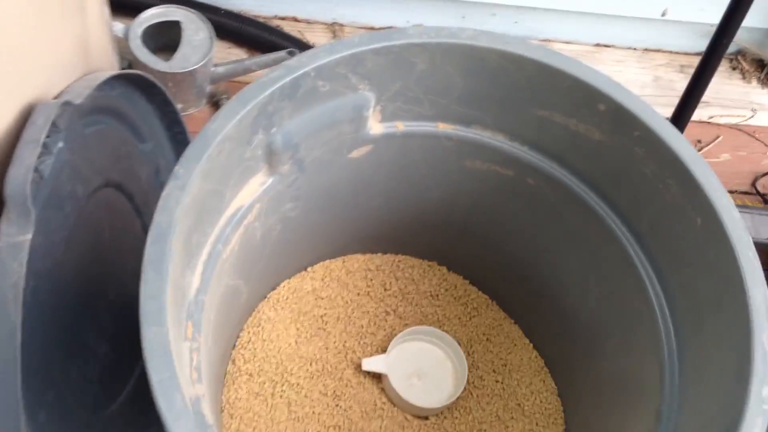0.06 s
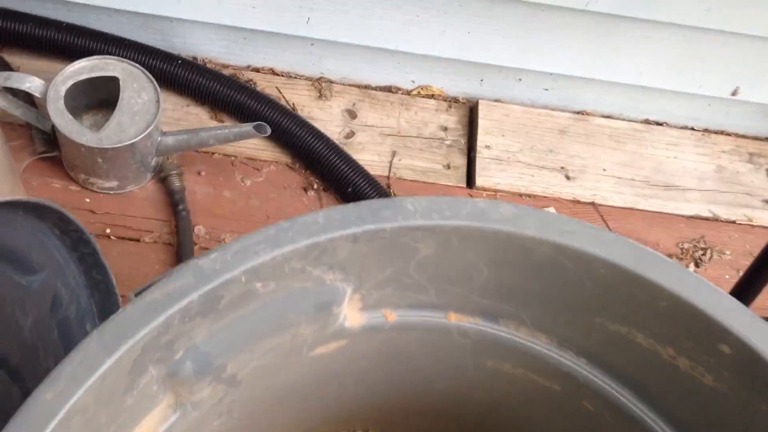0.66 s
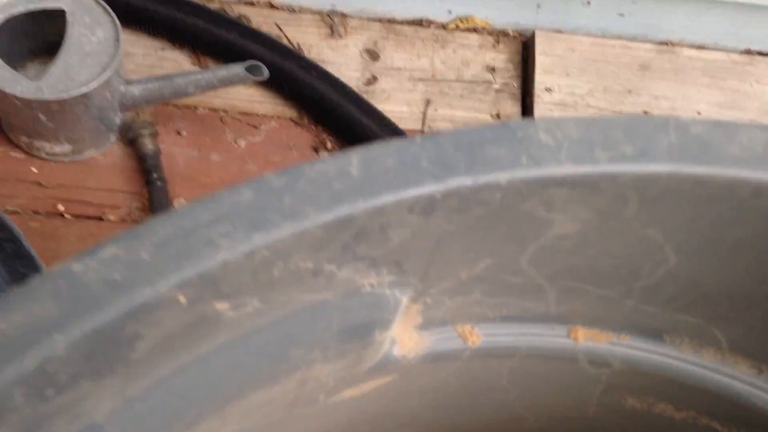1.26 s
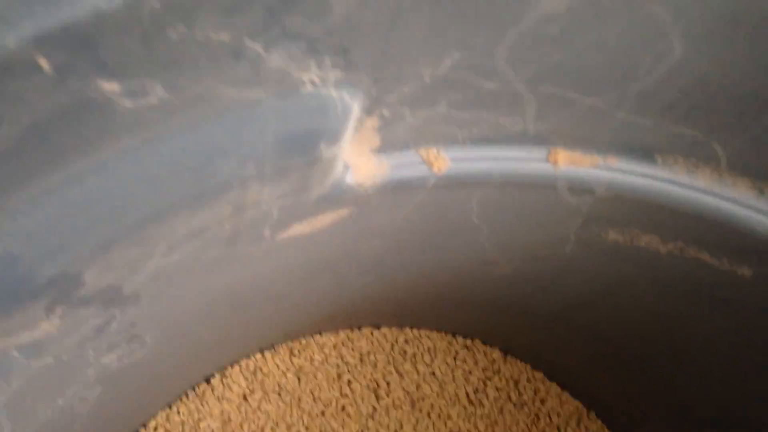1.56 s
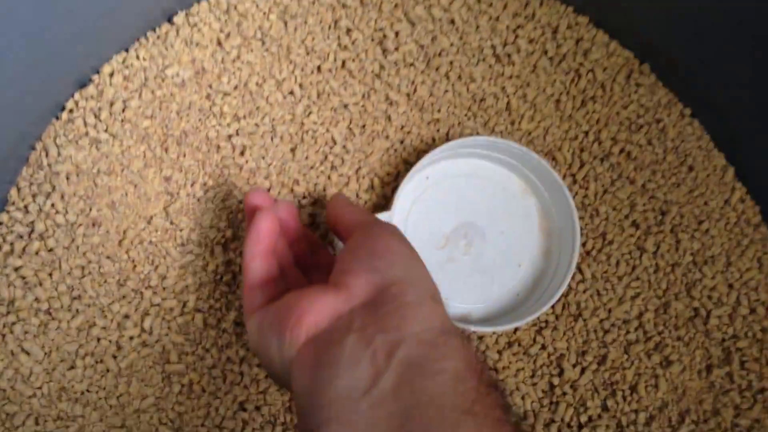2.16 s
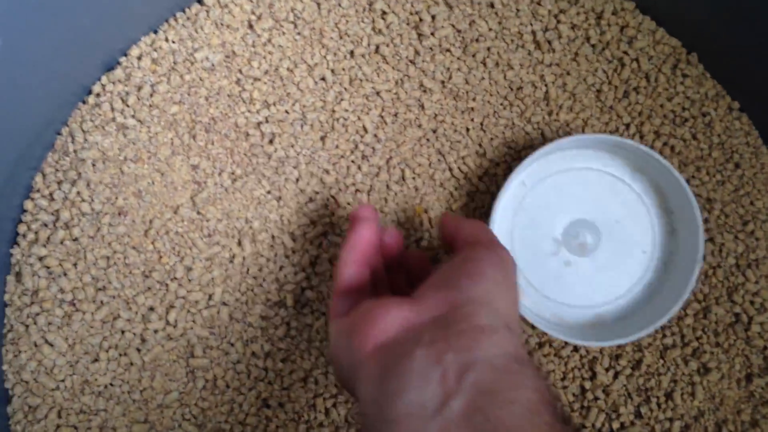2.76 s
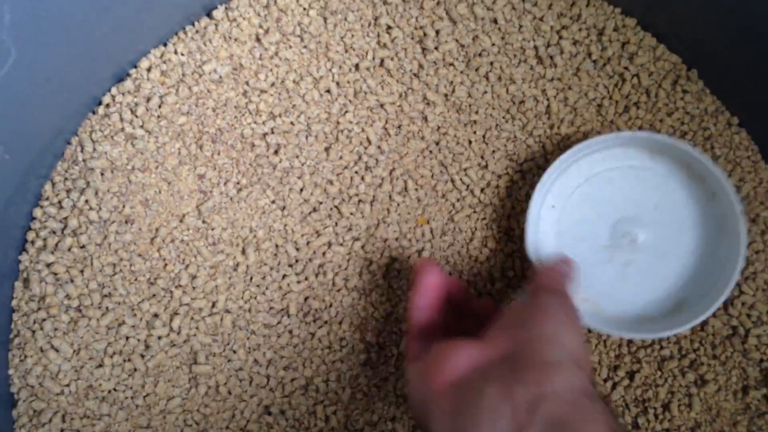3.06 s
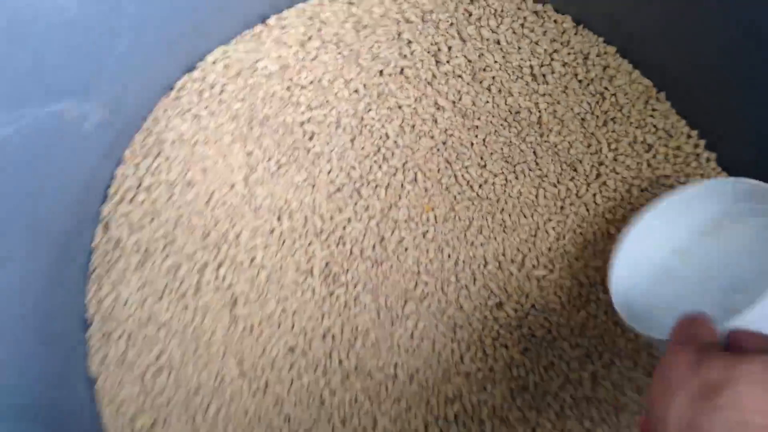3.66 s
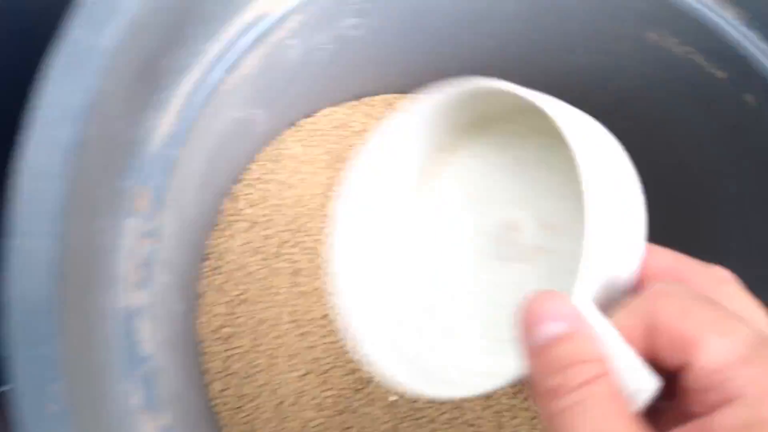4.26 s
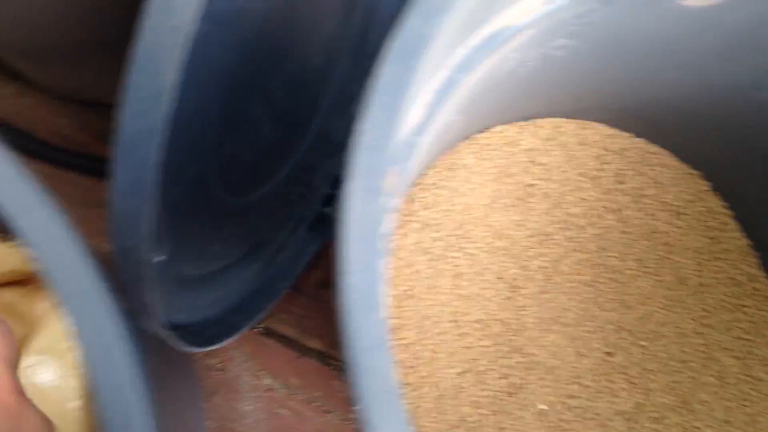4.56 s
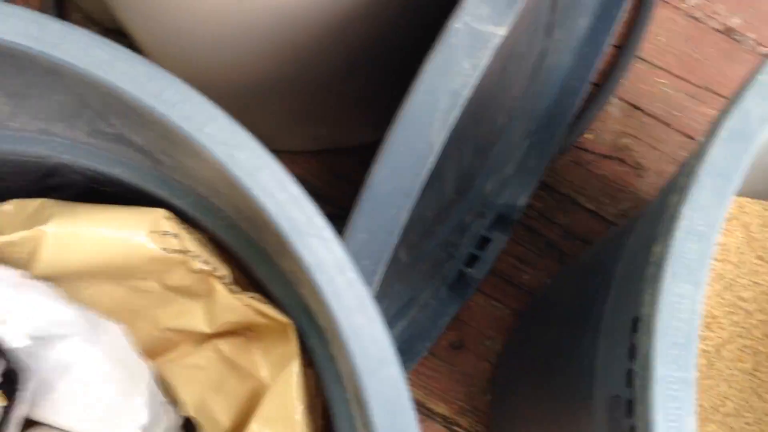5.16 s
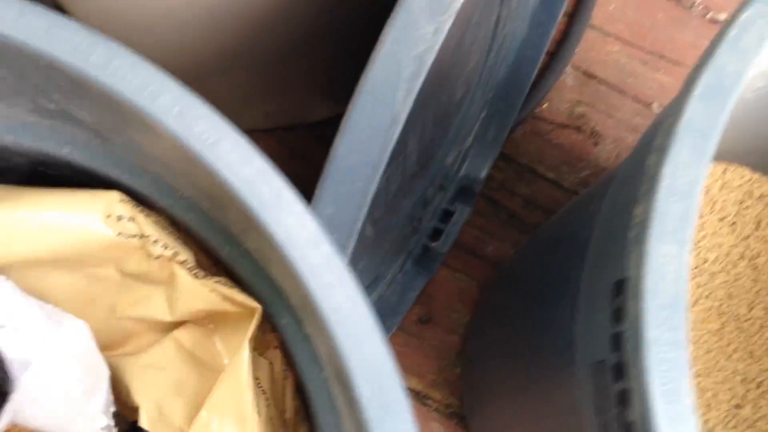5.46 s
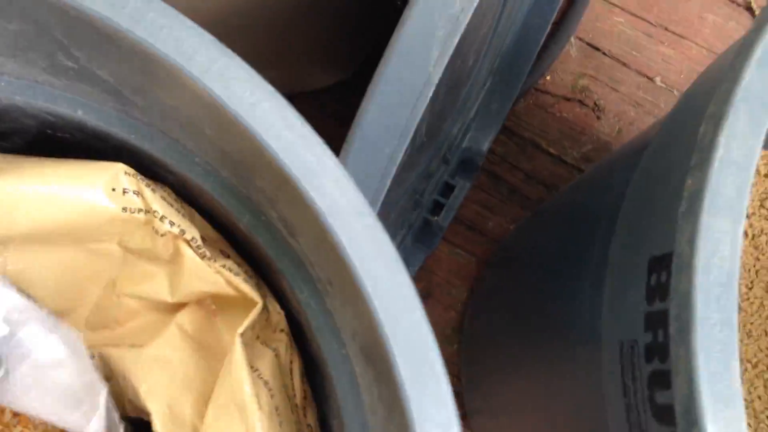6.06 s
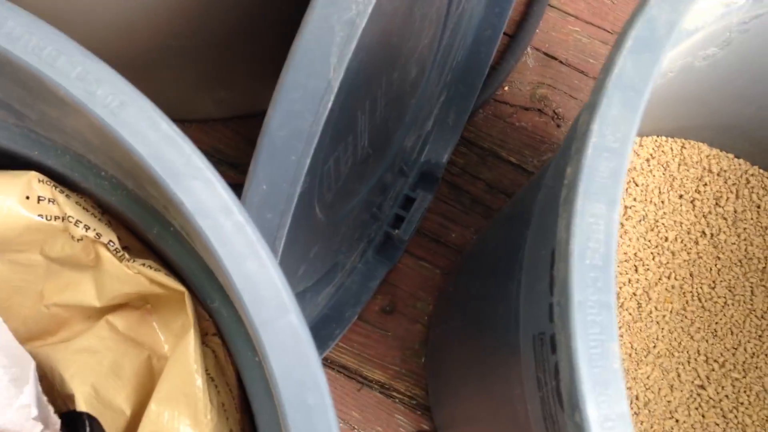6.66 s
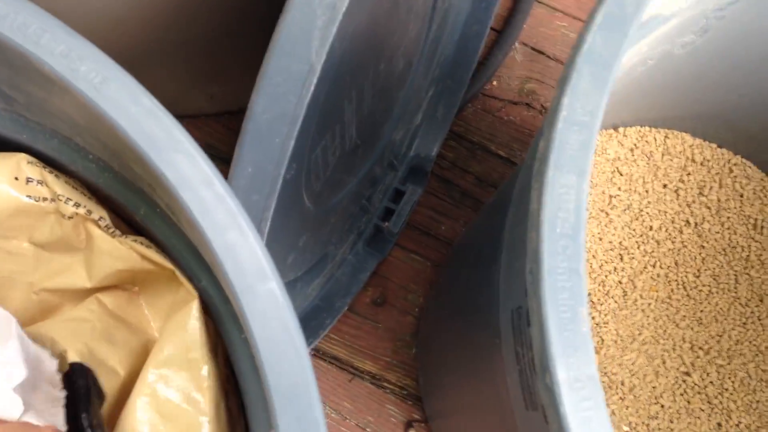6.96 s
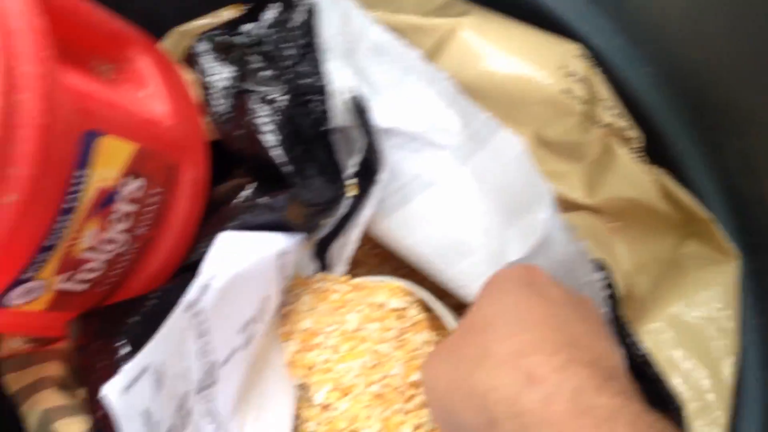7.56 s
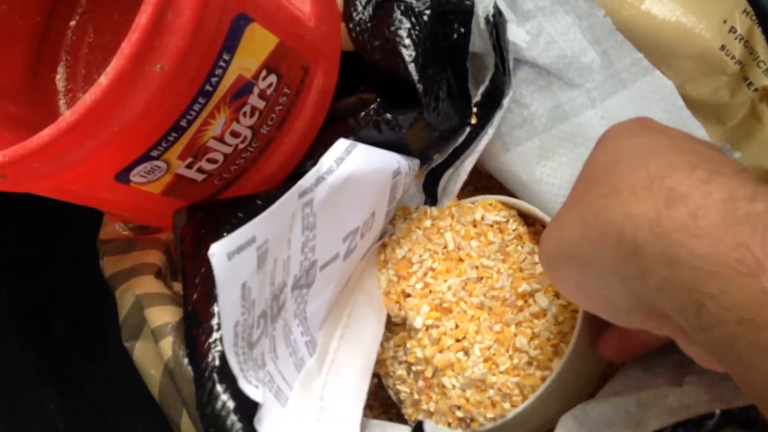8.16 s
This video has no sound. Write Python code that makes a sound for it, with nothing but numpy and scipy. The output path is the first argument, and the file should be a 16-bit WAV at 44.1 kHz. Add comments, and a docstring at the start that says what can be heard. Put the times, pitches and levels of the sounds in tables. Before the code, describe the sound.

A plastic cup scrapes through feed pellets in a bin, then a stiff bag of cracked corn crinkles and snaps.

```python
"""Light taps on plastic and a dull bump over quiet outdoor air and microphone handling rumble.
A plastic measuring cup is nudged, then dug through feed pellets in a big plastic bin: the pellets
ring its wall and hiss against each other. From about 4.9 s it pushes into a stiff bag of cracked corn
in the next bin: the sheet flexes and crinkles, corn slides along it, creases snap and panels buckle.
Hands bump the bins throughout."""
import sys
import numpy as np
from scipy import signal
from scipy.fft import rfft, irfft, next_fast_len
from scipy.io import wavfile
from scipy.ndimage import uniform_filter1d

SR = 44100
rng = np.random.default_rng(int(sys.argv[2]) if len(sys.argv) > 2 else 0)


def unload_audio(sound):
    """Save the sound as a 16-bit wav file, at the path given as the first command line argument."""
    columns = np.transpose(np.atleast_2d(sound))
    # keep every value between -1 and 1, then stretch to whole-number steps
    steps = np.round(np.clip(columns, -1, 1) * 32767)
    wavfile.write(sys.argv[1], SR, steps.astype(np.int16))


N = 371322
TIME_S = np.arange(N) / SR
COARSE_TIME_S = TIME_S[::32]

# Bag creases snapping. Each row: start in seconds, crack level in dB, crack pitch in Hz,
# pop, sizzle and panel thump levels in dB, panel pitch in Hz.
CREASE_SNAPS = [(4.866, -48, 2280.0, -46, -47, -34, 193.3), (4.9, -35.5, 2290.0, -38, -41, -39, 307),
                (4.911, -37.5, 2350.0, -48, -49, -30.5, 245.0), (4.9316, -38, 2350, -46, -30.5, -46, 295.0),
                (4.979, -30, 2590, -37, -33.5, -42, 355.0), (5.0019, -28.5, 2500, -29, -33.5, -39, 345.0),
                (5.03, -26, 2490, -36.5, -35, -47, 360.0), (5.068, -33, 2550, -36.0, -29.5, -43, 210.0),
                (5.073, -27, 2330, -34, -32, -23, 426), (5.105, -25, 2740, -35, -38, -26.5, 197),
                (5.128, -32.5, 2250.0, -34.5, -54, -33, 240.0), (5.151, -46, 2120, -40, -60.0, -34.5, 227),
                (5.2517, -47, 2240.0, -38.5, -53, -32, 298), (5.326, -28.0, 2220, -29.5, -34, -33, 430.0),
                (5.3405, -20, 2040, -29, -23.5, -25.5, 231), (5.365, -23.0, 2400, -26, -38, -27.5, 290.0),
                (5.3785, -18, 2400, -24, -25.5, -33, 475.0), (5.388, -29, 1950.0, -43, -31, -35, 215.0),
                (5.486, -27, 2080.0, -31.5, -38, -29.5, 265.0),
                (5.526, -27.5, 1810.0, -26, -27, -37, 295.0),
                (5.532, -28, 1800.0, -28.5, -29.5, -29.5, 410.0),
                (5.604, -25.5, 2040.0, -32, -28.5, -32, 495.0), (5.6075, -26.5, 1960, -24, -25, -27.5, 506),
                (5.7009, -24.5, 2420.0, -31, -47, -38, 193),
                (5.7962, -32.5, 2360.0, -40.0, -40, -46, 225.0), (5.8622, -37, 2040, -35, -49, -37, 280.0),
                (5.959, -29.5, 2470, -30.5, -38.5, -36, 260.0),
                (6.0115, -34.5, 2330, -44, -34.0, -39, 165.0), (6.048, -34.0, 2240.0, -33, -47, -49, 360.0),
                (6.063, -29.5, 2030, -30.5, -44, -32.5, 590.0), (6.1137, -26.5, 2120, -37, -35, -46, 195.0),
                (6.1669, -25.5, 2520.0, -33, -33, -36.5, 385.0),
                (6.1971, -25.0, 2400, -29, -32.5, -34, 450),
                (6.2513, -24.5, 2230.0, -41, -36.5, -28.5, 285.0), (6.265, -28, 1970, -31, -47, -27, 161),
                (6.3343, -28.5, 2430.0, -30.0, -38.0, -32.0, 483),
                (6.3703, -42.5, 2470, -35.5, -45, -28.5, 320.0),
                (6.406, -24.5, 2110.0, -27.5, -37.5, -44, 315.0),
                (6.5435, -25.5, 2400, -33.5, -28.5, -34.5, 175.0),
                (6.5735, -23.5, 2280, -30, -26.5, -36.0, 295.0), (6.5786, -22, 2470.0, -44, -39, -33, 253),
                (6.599, -32, 2480, -41, -34.5, -40.5, 240.0), (6.634, -30, 2090.0, -59, -33.5, -62, 385.0),
                (6.696, -31, 3180, -35.5, -35.5, -48.5, 550.0),
                (6.8179, -31.5, 1900, -41, -44.5, -29.5, 278),
                (6.8853, -37.0, 2060.0, -40, -53, -33.5, 258),
                (6.9156, -39, 2070, -34.5, -46, -44.0, 210.0), (6.949, -31, 2520, -39, -45.5, -37.5, 189),
                (7.0029, -30, 2280.0, -39, -30.5, -42, 245.0),
                (7.0324, -32.0, 2400, -33.5, -34.5, -32, 307),
                (7.043, -37.0, 1880, -37.0, -53.5, -27.5, 195.0),
                (7.063, -29, 2050, -26.5, -40, -41, 345.0), (7.0887, -19, 2160.0, -19.5, -24.5, -27.0, 345),
                (7.1752, -33, 2180.0, -42, -46, -29, 444), (7.2086, -33.5, 2500, -53, -40, -59, 285.0),
                (7.3599, -33.5, 2440, -42, -40, -53, 250.0), (7.7332, -54, 1860, -37.5, -60, -30, 305),
                (7.7743, -44, 1940, -42.5, -44, -35.5, 223), (7.8318, -46.5, 2000, -46, -48.5, -55, 300),
                (8.0054, -31, 1690, -27, -35.5, -29, 380), (8.098, -44.5, 2720, -46.0, -37.5, -47, 235.0),
                (8.2654, -22.5, 2400, -29.5, -21.0, -21, 213),
                (8.2935, -32, 1630.0, -31, -50, -34.5, 350.0),
                (8.3158, -22, 2130.0, -44, -29.5, -46.5, 390.0),
                (8.3232, -20.5, 2500, -25.5, -25.5, -30.5, 307),
                (8.3665, -32.5, 1740.0, -32.5, -34.0, -40, 355.0)]
# Pushes on the bag. Each row: start and length in seconds, crinkle level in dB,
# flex and corn hiss in dB over the crinkle.
BAG_PUSHES = [(4.857, 0.23, -40.5, -1, 4.5), (5.031, 0.083, -35, -1.5, -4), (5.252, 0.06, -39.5, 6.5, 4),
              (5.315, 0.055, -31.5, -15, -4), (5.46, 0.048, -32.5, -4, -8.5),
              (5.507, .11, -29.5, -3.5, -3.5), (5.622, 0.025, -32, -0.5, -3),
              (5.708, 0.075, -34.5, -2.5, -3), (5.83, .11, -42.5, 1.5, -2.5), (5.985, 0.14, -42, 1, -4.5),
              (6.144, 0.065, -39, -2, -6), (6.319, 0.06, -44, 6.5, -4), (6.502, 0.12, -39, -1.5, -1.5),
              (6.786, 0.34, -57, 10, 3), (7.012, 0.093, -42, 6, -2.5), (7.141, 0.13, -50.5, 3.5, 7),
              (7.932, 0.2, -53.5, 2.5, -2.5), (8.237, 0.097, -46, -3, -2)]
# Cup strokes. Each row: start and length in seconds, ring level in dB, pellet hiss in dB over the ring.
CUP_STROKES = [(1.849, 0.099, -55.5, -8), (2.404, .14, -53.5, -3), (2.555, 0.098, -43.5, -5.5),
               (2.68, 0.057, -39.5, -7.5), (2.796, 0.092, -45.5, -1.5), (2.841, 0.012, -46, 10.5),
               (2.873, 0.017, -52.5, 11), (2.965, 0.049, -47.5, 0.5), (3.116, 0.03, -45, 9.5),
               (3.156, 0.22, -39, 0.5), (3.395, 0.028, -56, 10), (3.546, 0.015, -35, 4),
               (3.574, 0.019, -28, -0.5), (3.618, 0.029, -36.5, -9.5), (3.663, 0.037, -32.5, -1.5),
               (3.953, 0.055, -57.5, 3.5), (4.205, 0.081, -54.5, -5.5)]
# Knocks on plastic. Each row: start in seconds, peak in dB, pitch in Hz, 60 dB decay time in seconds.
PLASTIC_TAPS = [(.047, -27.5, 944, 0.0083), (.166, -27, 950, 0.0065), (.756, -38, 1030, .023),
                (1.977, -34.5, 2530, 0.017), (3.5965, -17.5, 1350, 0.041), (3.597, -14, 1920, 0.02),
                (3.724, -32, 2360, 0.042), (3.8, -42, 2330, .089)]
HAND_BUMPS = [(.426, -34.5, 161, 0.08), (1.718, -39, 90, 0.061), (3.345, -33, 91, 0.068),
              (3.354, -27.5, 390, 0.095), (4.508, -30, 93, 0.12), (4.866, -29, 100, 0.054),
              (5.174, -32, 130, .06), (7.579, -31, 84, 0.068), (7.75, -30, 106, 0.13),
              (8.15, -33.5, 152, 0.057), (8.224, -28, 88, 0.094)]
# Modes of the cup and of the bin's air. Each row: frequency in Hz, width in Hz, relative level in dB.
CUP_RESTING_MODES = [(1344, 163, 0.5), (1625, 44, -6), (1870, 130, -5), (2280, 270, -4.5), (2427, 160, 0)]
CUP_DIGGING_MODES = [(1350, 170, 5.7), (1593, 110, 6.4), (1894, 220, 6.3), (2440, 190, 5.8)]
CUP_UPPER_MODES = [(3800, 230, 3), (4253, 140, 2), (4860, 120, -1.5), (5950, 250, -3)]
BIN_DEEP_MODES = [(143, 94, -0.5), (349.3, 28, 7.5)]
BIN_RIM_MODES = [(233, 54, 1.5), (496, 33, 4), (883, 64, -7)]
# Noise spectra. Each row: frequency in Hz, relative density in dB.
BAG_FLEX_SPECTRUM = [(70, -56), (135, 6), (300, 3.5), (410, -11), (505, 2.5), (620, -9), (900, -27)]
BAG_CRINKLE_SPECTRUM = [(450, -13), (650, 4), (1100, 7), (1450, 7), (1700, 4), (2050, 10), (2600, 4.5),
                        (3800, -22)]
CORN_SPECTRUM = [(2700, 9), (3500, 3.5), (4200, 5), (5500, 2), (7000, 0), (10000, -11.5), (15500, -15.5)]
PELLET_SPECTRUM = [(2600, -2), (3150, 4.5), (3600, -0.5), (5400, 6), (6400, 2), (7200, -3), (9000, -6.5),
                   (15500, -24)]
HANDLING_SPECTRUM = [(20, -30), (35, -7), (55, 1.5), (100, 0), (150, -4), (220, -13.5), (400, -25)]
AIR_SPECTRUM = [(100, 3), (330, 0), (900, 0.5), (1300, -3), (2000, -9), (2900, -20), (4200, -24.5),
                (7000, -58)]
MIC_SPECTRUM = [(1500, -3), (3000, -2), (4300, 6), (10000, 1.5), (16000, 0)]
# Background level curves. Each row: time in seconds, level in dB.
HANDLING_LEVELS = [(0, -48.5), (.8, -61.5), (2.1, -53.5), (2.7, -46), (3.4, -46.5), (4.2, -56.5),
                   (5.2, -50), (6.4, -51.5), (7.4, -58), (7.56, -47.5), (8.05, -55), (8.24, -43),
                   (8.42, -54)]
AIR_LEVELS = [(0, -50.5), (1.3, -51), (2.1, -54), (3.4, -53.5), (4.3, -50.5)]
# Microphone depth in the bin. Each row: time in seconds, share from 0 (rim) to 1 (deep).
MIC_DEPTH = [(1.6, 0.45), (2.0, 0.98), (3.7, 0.86), (4.1, 0.46)]
# Faint high swishes. Each row: centre in seconds, level in dB, half length in seconds.
HIGH_SWISHES = [(0.152, -63.5, .05), (0.736, -57, 0.011), (0.953, -60, 0.055)]


def bag_snaps():
    """A crease cracks and sizzles, the facet beside it pops about an octave lower, the panel buckles."""
    out = np.zeros(N)
    for start_s, crack_db, crack_hz, pop_db, sizzle_db, thump_db, panel_hz in CREASE_SNAPS:
        slip = slip_burst(decay_s=0.001072, rise_s=0.0012, tail_db=-26, tail_s=0.005, jolt=0.76)
        crack = band(resonate(slip, crack_hz, width_hz=324), 1260, 3600)
        facet = slip_burst(decay_s=0.0017, rise_s=0.00067, tail_db=-24, tail_s=0.0074, jolt=0.98)
        pop_hz = crack_hz * 0.56 * rng.uniform(0.87, 1.16)
        pop = band(resonate(facet, pop_hz, width_hz=590), 550, 1650)
        spray = slip_burst(decay_s=0.0012, rise_s=0.0006, tail_db=-18, tail_s=0.0046, jolt=0.37)
        edge_hz = 4870 * 2 ** ((sizzle_db - crack_db) / 31)  # an octave up per 31 dB over the crack
        sizzle = band(band(spray, 3130, 11400, order=3), 2900, max(edge_hz, 3500), order=1)
        buckle = slip_burst(decay_s=0.0033, rise_s=0.00057, tail_db=-22, tail_s=0.0093, jolt=0.9)
        thump = band(resonate(buckle, panel_hz, width_hz=0.33 * panel_hz), 108, 920)
        for part, db in (crack, crack_db), (pop, pop_db), (sizzle, sizzle_db), (thump, thump_db):
            add(out, start_s, at_level(part, db))
    return out


def slip_burst(decay_s, rise_s, tail_db, tail_s, jolt):
    """A crease gives way: one jolt in a volley of micro-slips, then a brief shiver."""
    t = TIME_S[:SR // 12]
    shape = (1 - np.exp(-t / rise_s)) ** 2 * (np.exp(-t / decay_s) + from_db(tail_db) * np.exp(-t / tail_s))
    slips = rng.standard_normal(len(t)) * shape
    slips[np.argmax(shape)] += jolt * np.linalg.norm(slips)
    return slips


def bag_rustle():
    """Each push flexes the sheet, ticks its small creases and slides corn along it; then it settles."""
    starts_s, lengths_s, crinkle_db, flex_db, hiss_db = np.transpose(BAG_PUSHES)
    pushes = [gesture_power(start_s, length_s, attack_s=0.025, release_s=0.024, tail_db=-18, tail_s=0.58)
              for start_s, length_s in zip(starts_s, lengths_s)]
    creases = grains(per_s=900, spread_db=2, clump_db=4)
    clicks = grains(per_s=1500, spread_db=1.5, clump_db=5)
    ticks = pitched(clicks, low_hz=485, high_hz=11800, q=10)
    corn = grains(per_s=11000, spread_db=1, clump_db=2.5)
    crackle = unit_rms(colour(ticks, BAG_CRINKLE_SPECTRUM) + colour(creases, BAG_CRINKLE_SPECTRUM))
    flex = gesture_gain(pushes, crinkle_db + flex_db) * colour(creases, BAG_FLEX_SPECTRUM)
    crinkle = gesture_gain(pushes, crinkle_db) * crackle
    hiss = gesture_gain(pushes, crinkle_db + hiss_db) * colour(corn + 0.4 * ticks, CORN_SPECTRUM)
    return flex + crinkle + hiss


def cup_in_pellets(dig_start_s=3.56):
    """Pellets tick on the cup wall and rub on each other; the cup's modes shift as it digs in."""
    starts_s, lengths_s, ring_db, hiss_db = np.transpose(CUP_STROKES)
    # Pellets run on longer after a longer stroke; the tail is the last ones trickling into the furrow.
    strokes = [gesture_power(start_s, length_s, attack_s=0.02, release_s=0.0078 + 0.28 * length_s,
                             tail_db=-33.5, tail_s=0.57)
               for start_s, length_s in zip(starts_s, lengths_s)]
    contacts = grains(per_s=900, spread_db=1.5, clump_db=0.5)
    sliding = grains(per_s=5000, spread_db=1.5, clump_db=2)
    dug = np.clip((TIME_S - dig_start_s) / 0.0073, 0, 1)
    resting = np.sqrt(1 - dug) * ring_modes(contacts, CUP_RESTING_MODES, wander_db=1.5)
    digging = np.sqrt(dug) * ring_modes(contacts, CUP_DIGGING_MODES)
    upper_ring = ring_modes(contacts, CUP_UPPER_MODES, wander_db=4.5)
    grit = unit_rms(upper_ring + colour(sliding, PELLET_SPECTRUM))
    packed_crunch = from_db(-12.5) * unit_rms(band(sliding, 248, 440)) * (1 - dug)
    cup = gesture_gain(strokes, ring_db) * (resting + digging)
    pellets = gesture_gain(strokes, ring_db + hiss_db) * (grit + packed_crunch)
    return cup + pellets


def knocks(rows, rise_cycles, roughness):
    """Each knock rings one damped mode; a noise band stands for its neighbours."""
    out, t = np.zeros(N), TIME_S[:SR // 5]
    for start_s, peak_db, hz, t60_s in rows:
        neighbours = unit_rms(band(rng.standard_normal(len(t)), hz * 0.79, hz * 1.58))
        envelope = (1 - np.exp(-t * hz / rise_cycles)) * from_db(-60 * t / t60_s)
        ring = envelope * (np.sin(2 * np.pi * hz * t) + roughness * neighbours)
        add(out, start_s, from_db(peak_db) * ring / np.abs(ring).max())
    return out


def with_bin_echo(x, wet_db, t60_s):
    """Close walls add a short, dense echo."""
    t = TIME_S[:SR // 5]
    echo = band(rng.standard_normal(len(t)), 210, 3700, order=1) * from_db(-60 * t / t60_s) * (t > .002)
    return x + from_db(wet_db) * signal.fftconvolve(x, echo / np.linalg.norm(echo))[:N]


def handling_rumble(noise):
    """A hand moves on the microphone's case."""
    return level_curve(HANDLING_LEVELS) * colour(noise, HANDLING_SPECTRUM)


def outdoor_air(noise):
    """Broad rush of air, partly shaded inside the bin."""
    return level_curve(AIR_LEVELS) * colour(noise, AIR_SPECTRUM)


def bin_hum(noise):
    """Air resonates in the bin; microphone depth blends deep and rim modes."""
    depth = np.interp(TIME_S, *np.transpose(MIC_DEPTH))
    deep = from_db(-57) * ring_modes(noise, BIN_DEEP_MODES)
    rim = from_db(-52) * ring_modes(noise, BIN_RIM_MODES)
    return depth * deep + (1 - depth) * rim


def swishes(noise):
    """Brief, faint swells of high noise."""
    swells = sum(from_db(db) * np.exp(-((TIME_S - centre_s) / half_s) ** 2)
                 for centre_s, db, half_s in HIGH_SWISHES)
    return swells * unit_rms(band(noise, 4000, 4850))


def background():
    """Air, bin hum, swishes, handling and the microphone's own hiss, from independent noises."""
    air, hum, swish, rumble, hiss = rng.standard_normal((5, N))
    mic_hiss = from_db(-62.5) * colour(hiss, MIC_SPECTRUM)
    return outdoor_air(air) + bin_hum(hum) + swishes(swish) + handling_rumble(rumble) + mic_hiss


def grains(per_s, spread_db, clump_db):
    """Tiny contacts of uneven size, in clumps; power levelled over about 40 ms."""
    sizes = from_db(spread_db * np.minimum(rng.exponential(1, N), 5)) * rng.choice([-1, 1], N)
    hits = rng.random(N) < per_s / SR
    clicks = sizes * hits * from_db(clump_db * drift(per_s=160))
    return clicks / np.sqrt(uniform_filter1d(clicks ** 2, size=1800) + 1e-6)


def pitched(clicks, low_hz, high_hz, q, count=24):
    """Each contact rings briefly at a randomly dealt pitch; unit power."""
    dealt = rng.integers(0, count, N)
    pitches_hz = np.geomspace(low_hz, high_hz, count)
    return unit_rms(sum(resonate(clicks * (dealt == k) + 1e-18, hz, hz / q)
                        for k, hz in enumerate(pitches_hz)))


def ring_modes(x, modes, wander_db=0):
    """Parallel steep-sided resonances, each level drifting by wander_db; unit power."""
    out = np.zeros(N)
    for hz, width_hz, db in modes:
        ring = resonate(resonate(x, hz, width_hz), hz, width_hz)
        out += from_db(db + wander_db * drift(per_s=20)) * ring
    return unit_rms(out)


def gesture_power(start_s, length_s, attack_s, release_s, tail_db, tail_s):
    """Power of one hand movement: attack, hold, quick release, faint slow tail."""
    attack = np.clip((COARSE_TIME_S - start_s) / attack_s, 0, 1)
    after_s = np.maximum(COARSE_TIME_S - start_s - length_s, 0)
    tail = from_db(tail_db)
    release = (1 - tail) * np.exp(-after_s / release_s) + tail * np.exp(-after_s / tail_s)
    return (attack * release) ** 2


def gesture_gain(powers, levels_db):
    """Gain curve of overlapping movements, summed in power."""
    return np.interp(TIME_S, COARSE_TIME_S, np.sqrt(from_db(levels_db) ** 2 @ np.array(powers)))


def level_curve(rows):
    """Gain curve through (seconds, dB) points."""
    return from_db(np.interp(TIME_S, *np.transpose(rows)))


def drift(per_s):
    """Random straight-line wander; unit power."""
    knots = rng.standard_normal(8000)
    return unit_rms(np.interp(TIME_S * per_s, np.arange(len(knots)), knots))


def colour(x, spectrum):
    """Shape x by a spectrum, falling 20 dB per octave past its ends; unit power."""
    hz, db = np.transpose(spectrum)
    size = next_fast_len(N)
    octaves, knots = np.log2(np.fft.rfftfreq(size, 1 / SR) + 1), np.log2(hz)
    octaves_outside = np.abs(octaves - np.clip(octaves, knots[0], knots[-1]))
    gain = from_db(np.interp(octaves, knots, db) - 20 * octaves_outside)
    return unit_rms(irfft(rfft(x, size) * gain, size)[:N])


def band(x, low_hz, high_hz, order=2):
    """Causal band-pass."""
    edges_hz = [low_hz, min(high_hz, .45 * SR)]
    return signal.sosfilt(signal.butter(order, edges_hz, "band", fs=SR, output="sos"), x)


def resonate(x, hz, width_hz):
    """One resonance, unit peak gain."""
    r = np.exp(-np.pi * width_hz / SR)
    feedback = [1, -2 * r * np.cos(2 * np.pi * hz / SR), r * r]
    return signal.lfilter(np.array([1, 0, -1]) * (1 - r * r) / 2, feedback, x)


def notch(x, hz, width_hz):
    """Narrow spectral gap."""
    return x - resonate(x, hz, width_hz)


def from_db(db):
    """Decibels to gain."""
    return 10 ** (np.asarray(db) / 20)


def unit_rms(x):
    """Scale to unit power."""
    return x / np.sqrt(np.mean(x ** 2) + 1e-20)


def at_level(x, db):
    """Scale to the energy of 10 ms at this level."""
    return from_db(db) * x / np.sqrt(np.sum(x ** 2) / (SR / 100))


def add(out, start_s, sound):
    """Mix a sound in at start_s."""
    at = int(start_s * SR)
    out[at:at + len(sound)] += sound[:max(N - at, 0)]


def scene():
    """One close microphone; bag, knocks and cup have narrow gaps in the low treble."""
    taps = knocks(PLASTIC_TAPS, rise_cycles=1, roughness=0.17)
    bumps = knocks(HAND_BUMPS, rise_cycles=0.29, roughness=0.77)
    bag_and_knocks = bag_rustle() + with_bin_echo(bag_snaps() + taps + bumps, wet_db=-13.5, t60_s=0.026)
    cup = notch(cup_in_pellets(), hz=2780, width_hz=170)
    return (notch(bag_and_knocks, hz=2916, width_hz=65) + cup + background())[None]


def record(dry):
    """Soft-limit the peaks, then low-pass steeply."""
    ceiling, cutoff_hz = 1.5, 15400
    lowpass = signal.ellip(10, .1, 80, cutoff_hz, fs=SR, output="sos")
    return signal.sosfilt(lowpass, ceiling * np.tanh(dry / ceiling))


dry = scene()
out = record(dry)
unload_audio(out)
```